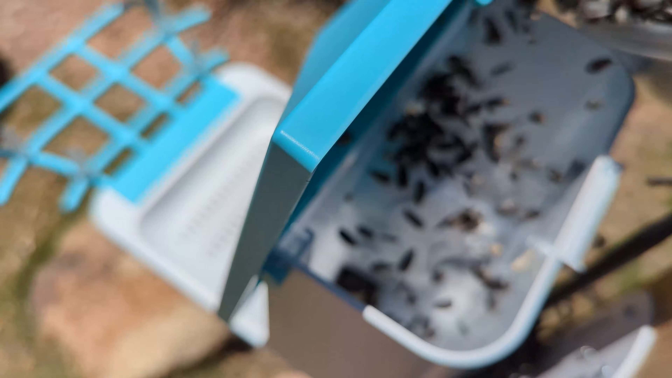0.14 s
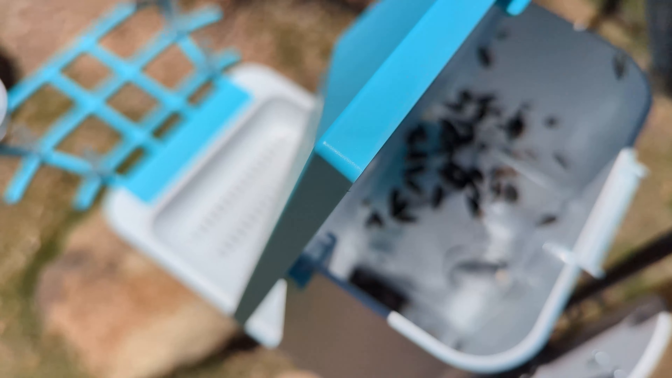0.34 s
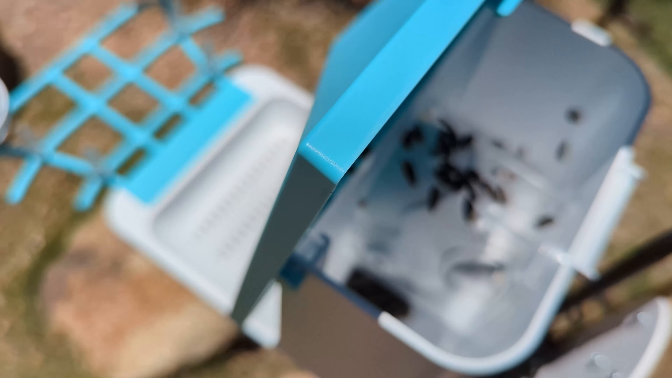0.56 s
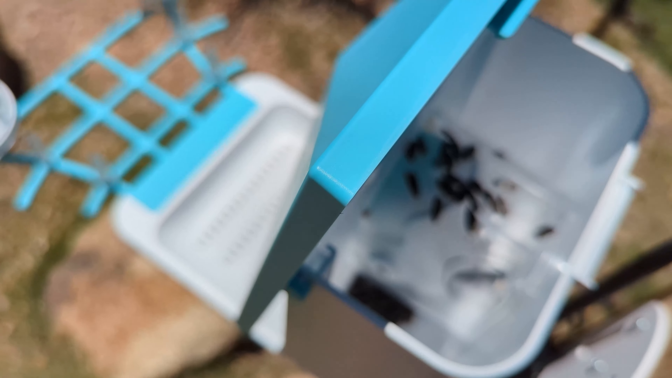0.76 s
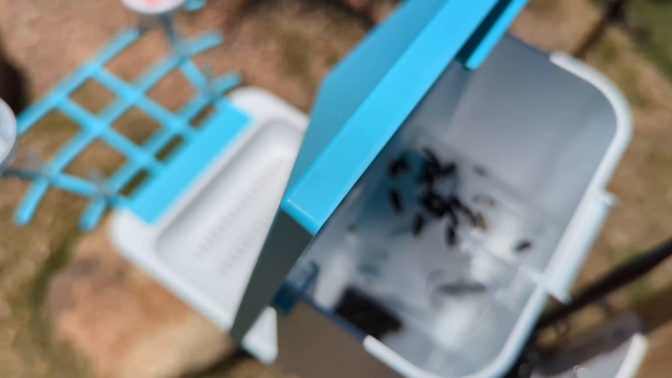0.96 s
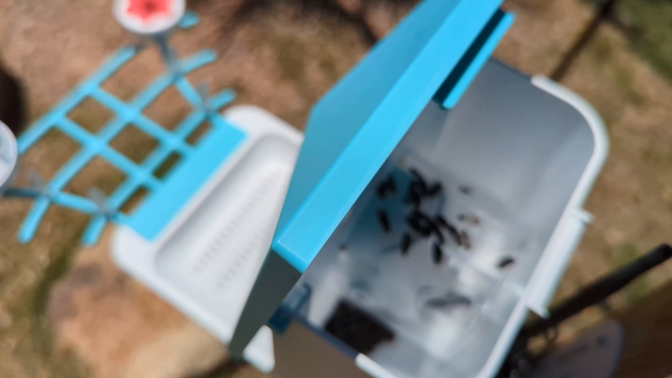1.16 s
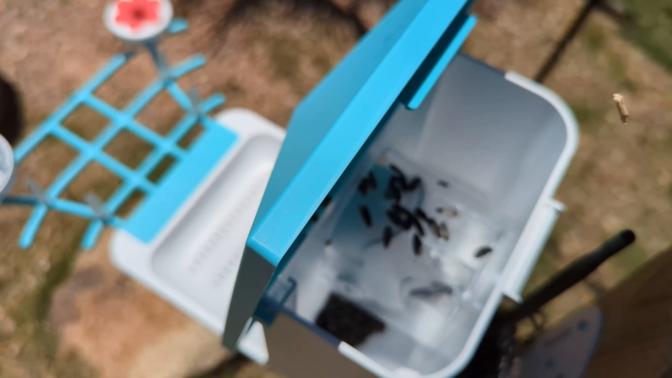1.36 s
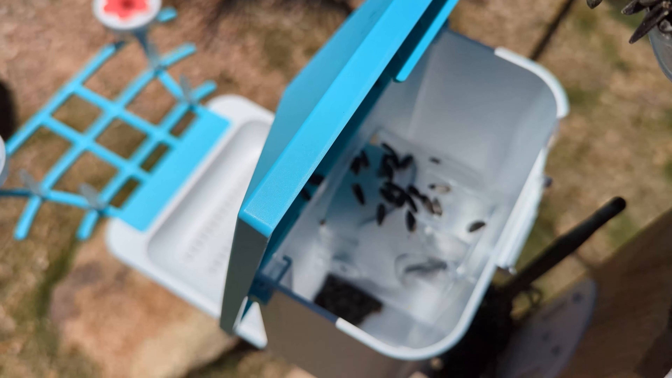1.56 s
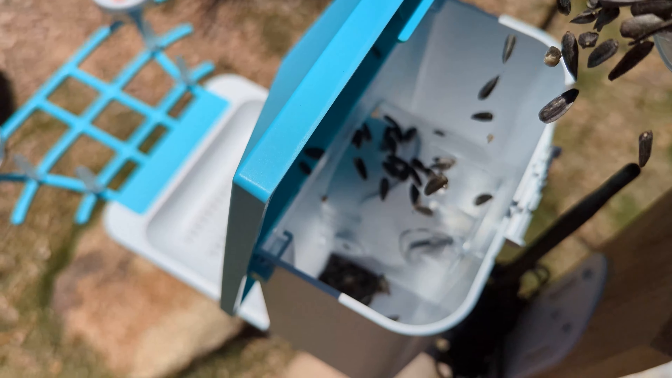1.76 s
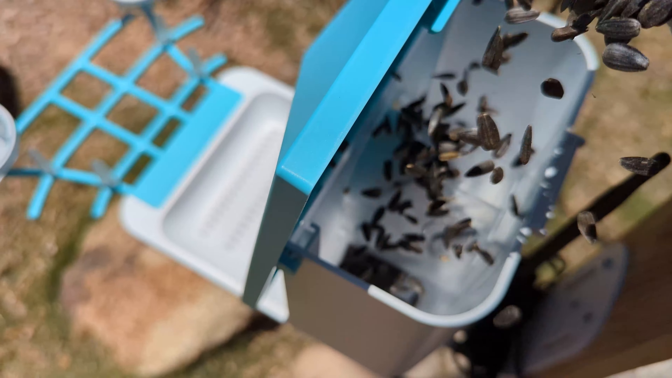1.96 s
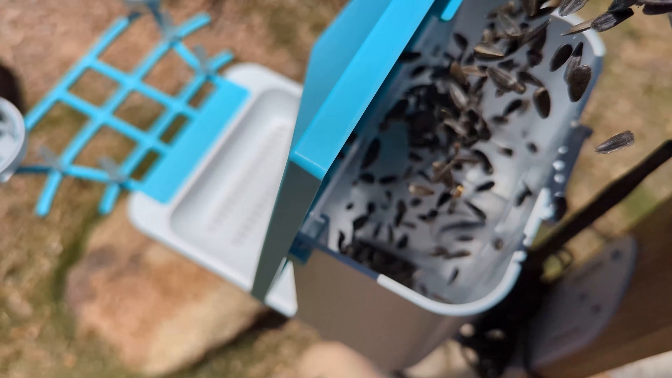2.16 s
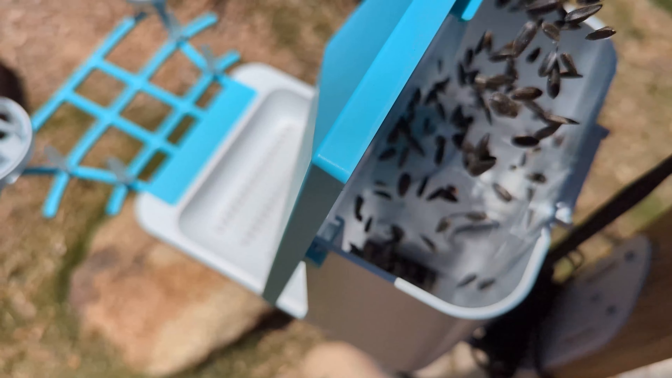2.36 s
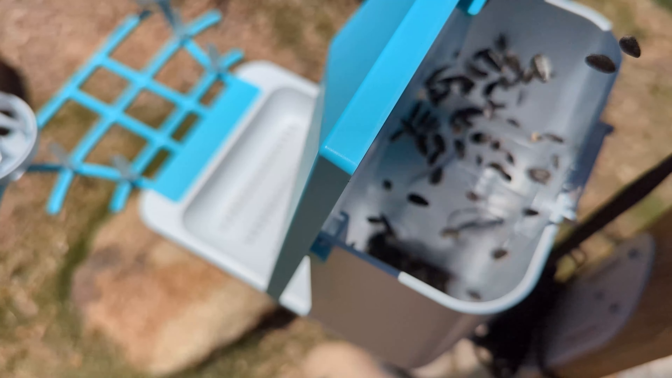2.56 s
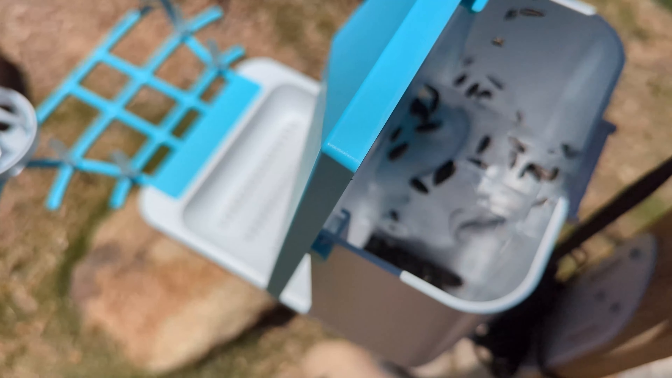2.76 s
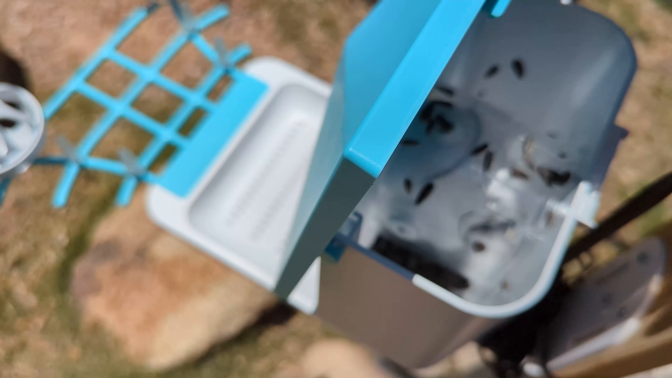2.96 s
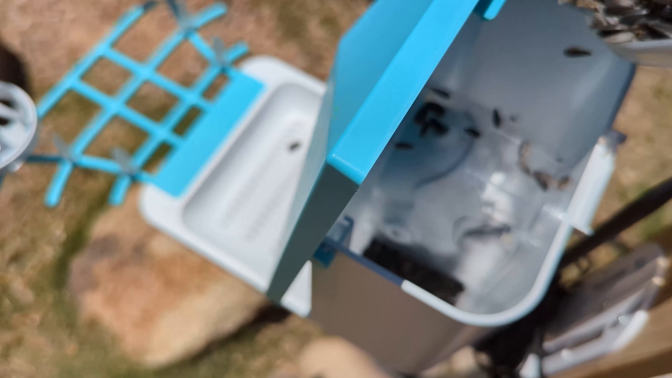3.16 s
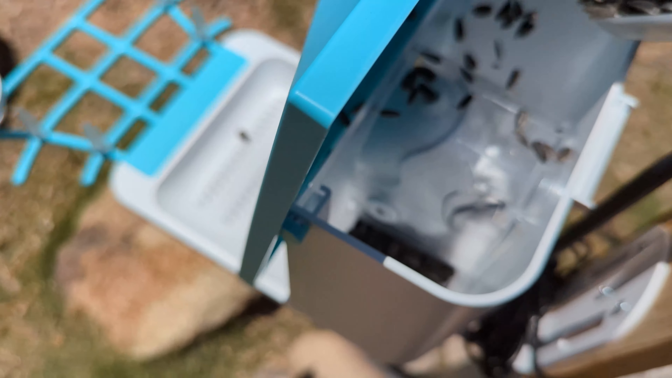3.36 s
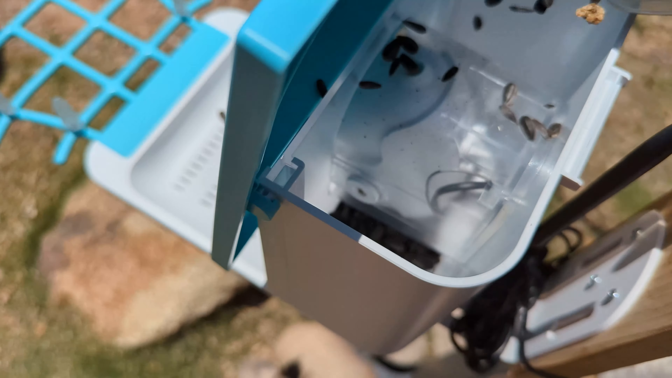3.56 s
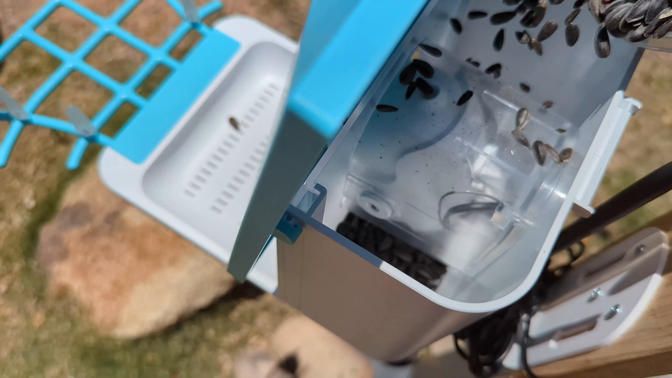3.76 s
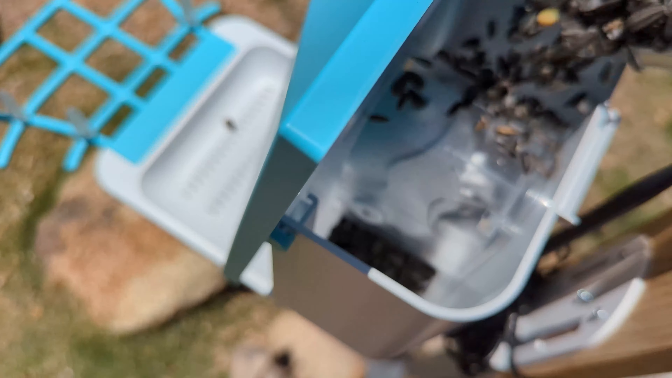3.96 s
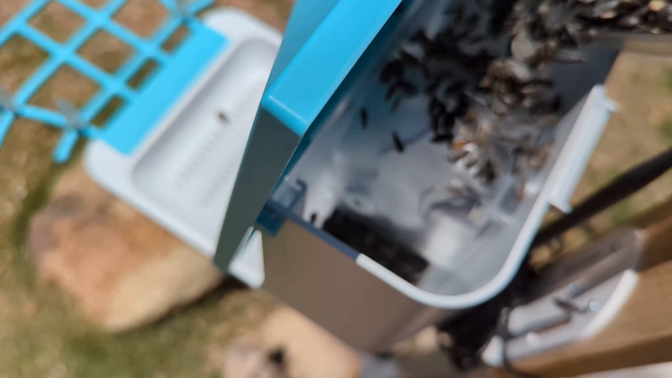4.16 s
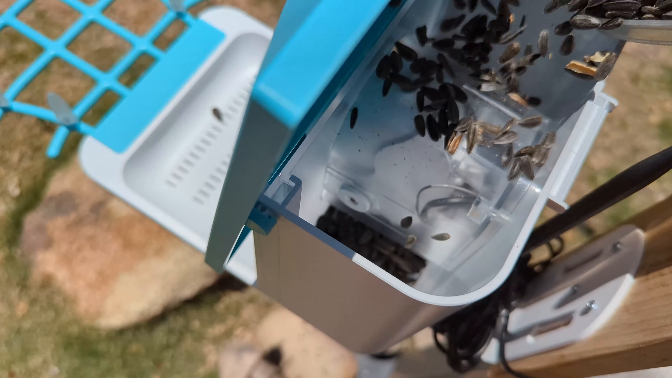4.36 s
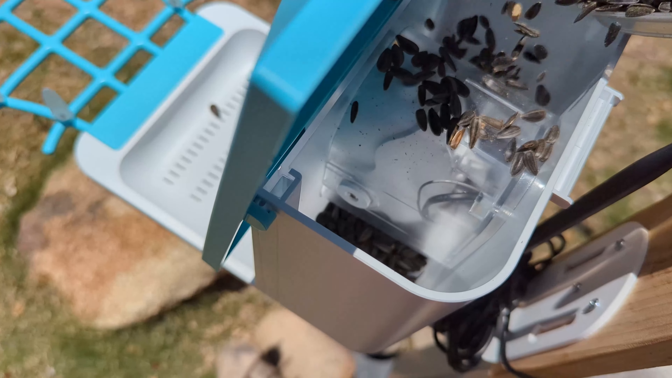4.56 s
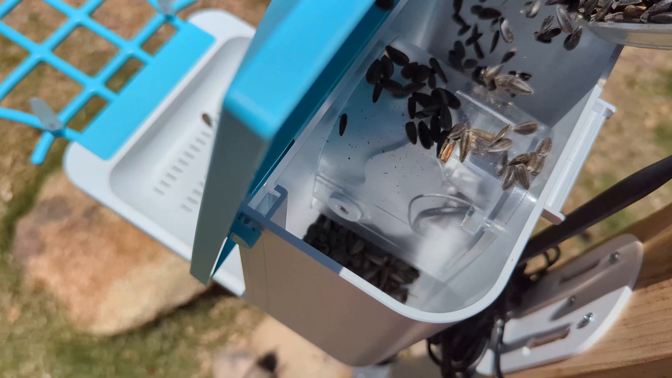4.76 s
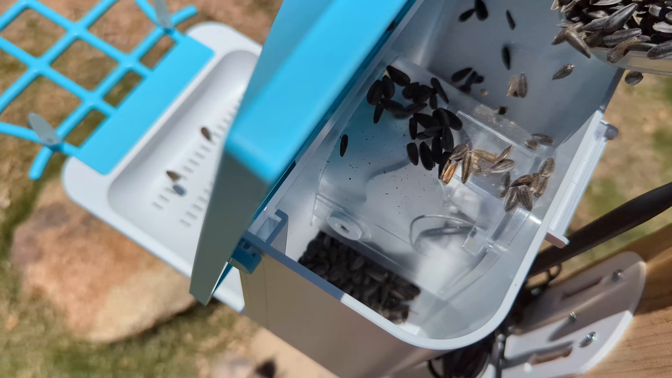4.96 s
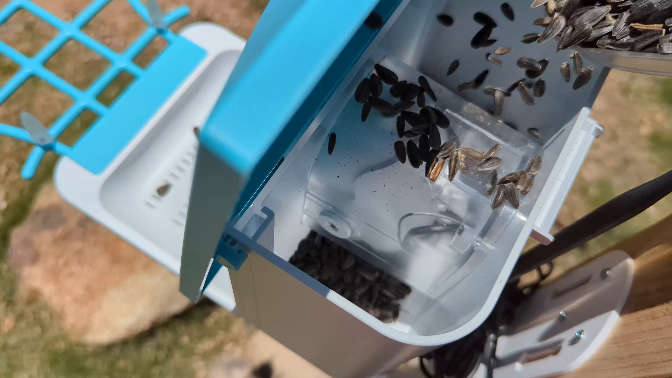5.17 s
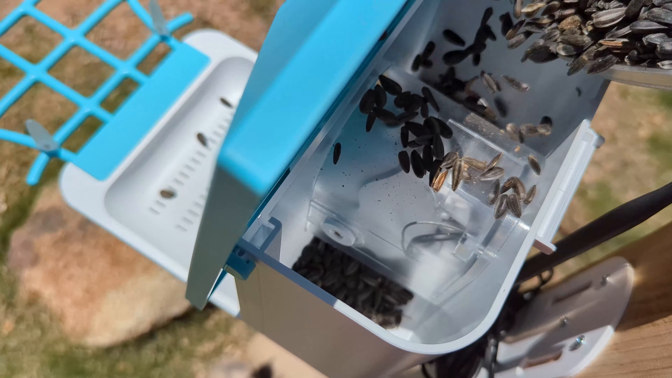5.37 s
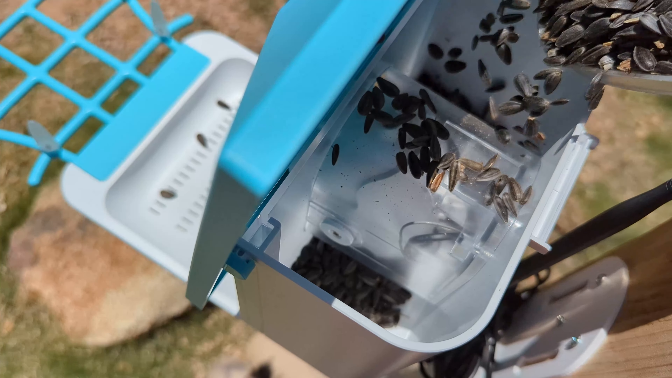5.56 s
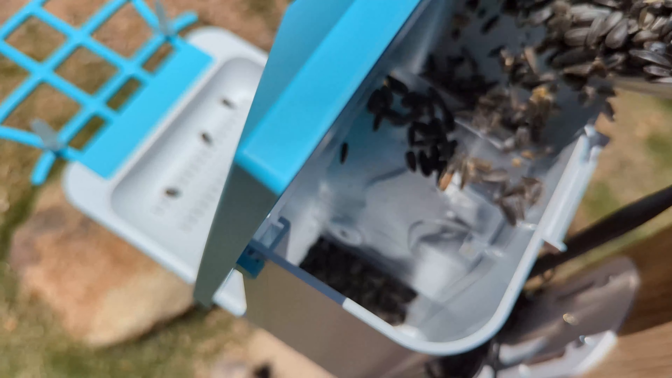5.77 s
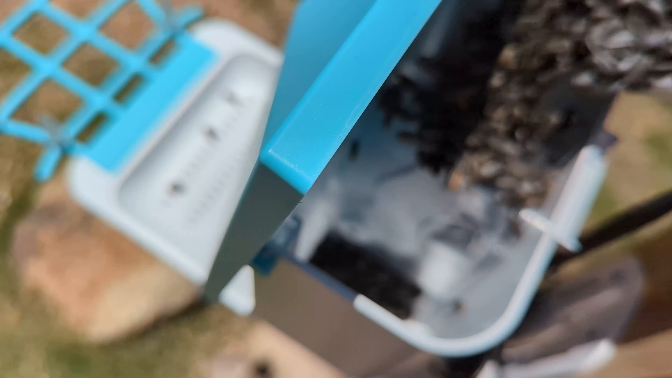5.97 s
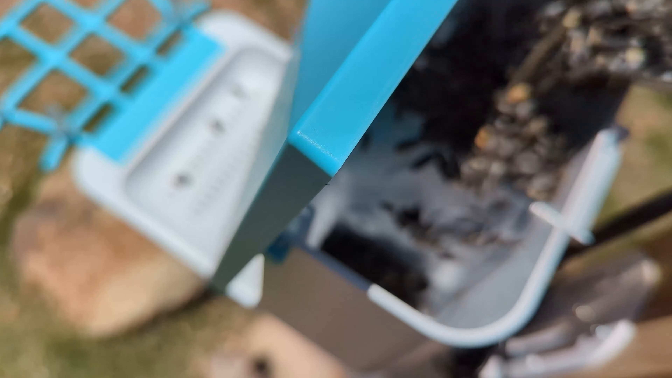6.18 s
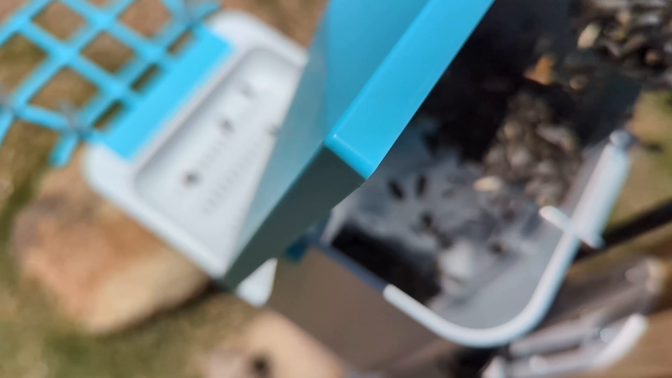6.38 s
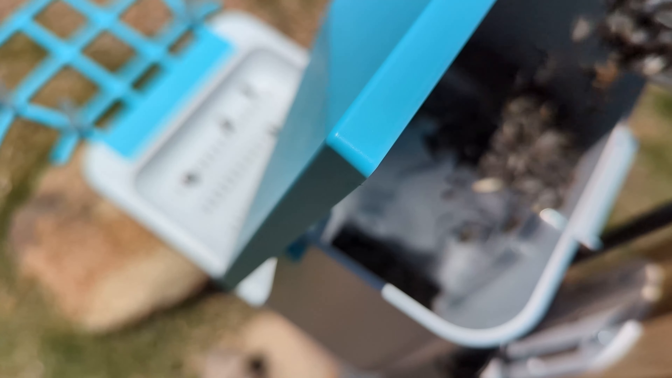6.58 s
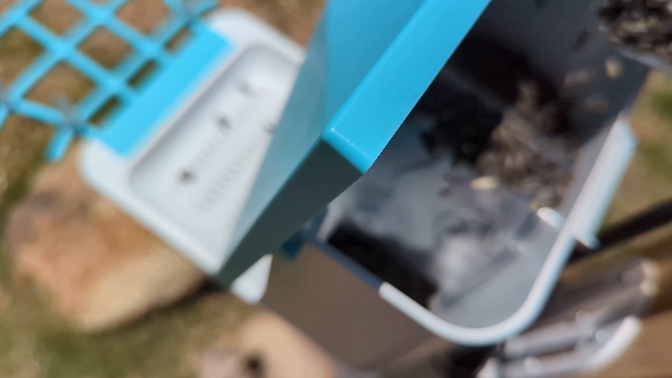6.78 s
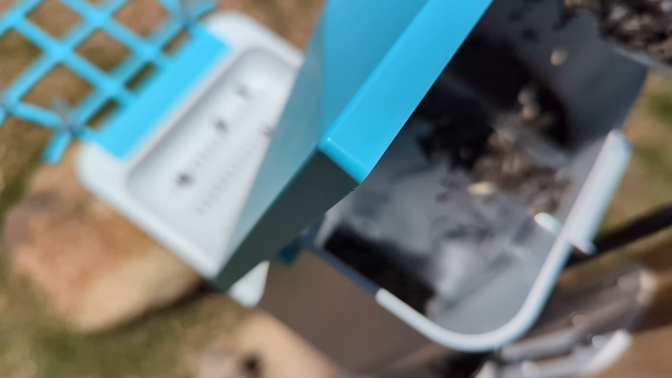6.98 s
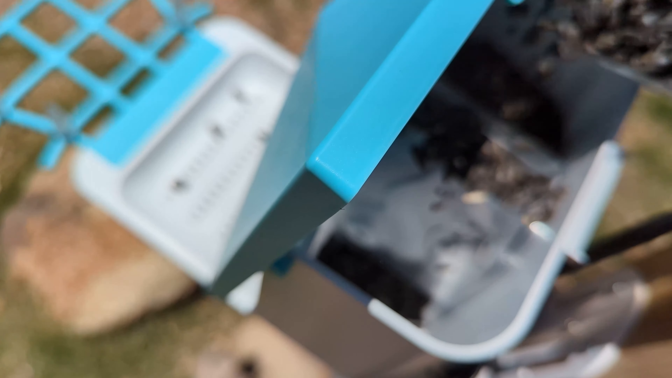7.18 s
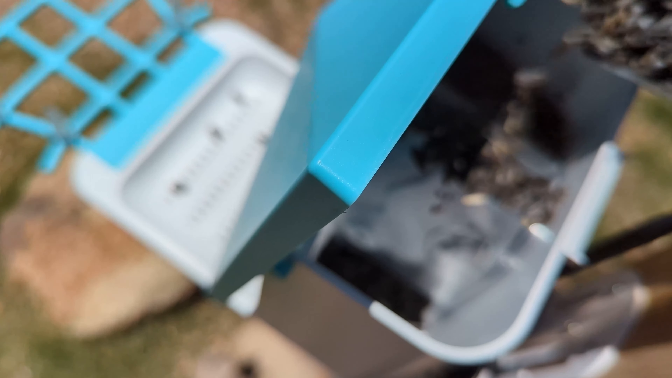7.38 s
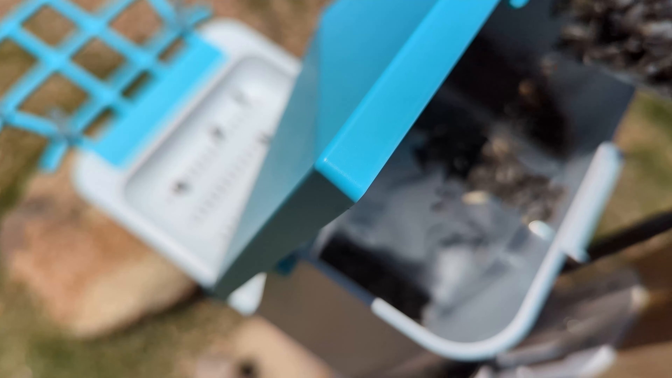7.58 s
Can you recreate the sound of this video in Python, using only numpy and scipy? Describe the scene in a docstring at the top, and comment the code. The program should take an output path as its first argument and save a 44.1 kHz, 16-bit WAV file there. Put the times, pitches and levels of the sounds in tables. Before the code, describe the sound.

Close to a bird feeder outdoors, dry seed is tipped into its plastic hopper in several goes. The first two pours are loud, bright rattles of bouncing seeds with a hollow ring, split by a near-silent pause. The following pours get quieter and turn to a dry rustle as the seed piles up. The hopper takes a few soft knocks and dull taps, and scattered seeds tick at the end. A rumble and hum lie very faintly underneath.

```python
"""Outdoors, close to a bird feeder, dry seed is poured in several goes into its plastic hopper.
Each seed lands with a short bright rattle of bounces that also rings the hopper's walls, a few deep
notes and a hollow note near 4 kHz. As the hopper fills, more seeds land on other seeds and rustle.
The hopper takes three soft knocks. A faint rumble and hum lie below; a noise gate, which turns
quiet stretches down, lets them sink in the pause between pours."""
import sys
import numpy as np
from scipy import signal
from scipy.fft import rfft, irfft
from scipy.io import wavfile
from scipy.ndimage import uniform_filter1d

SR = 44100
rng = np.random.default_rng(int(sys.argv[2]) if len(sys.argv) > 2 else 0)


def digitize_waveform(pressure):
    """Quantize a signal to 16-bit integers and store it at the path in sys.argv[1].

    Rows of a 2-D input are taken as channels; values are limited to [-1, 1].
    """
    field = np.atleast_2d(pressure).T
    bounded = np.clip(field, -1, 1)
    quanta = np.round(bounded * 32767).astype(np.int16)
    wavfile.write(sys.argv[1], SR, quanta)


N = 336483


def from_db(db):
    return 10 ** (np.asarray(db) / 20)


def unit_level(x):
    return x / np.sqrt(np.mean(x ** 2) + 1e-20)


def at_hz(rows, hz):
    """Read a level between rows of (pitch, level)."""
    pitches, levels = np.transpose(rows)
    return np.interp(np.log(hz), np.log(pitches), levels)


def in_time(rows):
    """Join each column of a table by straight lines in time."""
    seconds, *columns = np.transpose(rows)
    return [np.interp(np.arange(N) / SR, seconds, column) for column in columns]


def drift(turns_per_s):
    """A slow random wobble, about 1 in size."""
    points = rng.standard_normal(int(N / SR * 60) + 2)
    return np.interp(np.arange(N) / SR * turns_per_s, np.arange(len(points)), points)


def resonance(x, hz, width_hz):
    """Let through the sound near one pitch."""
    r = np.exp(-np.pi * width_hz / SR)
    feedback = [1, -2 * r * np.cos(2 * np.pi * hz / SR), r * r]
    return signal.lfilter(np.array([1, 0, -1]) * (1 - r * r) / 2, feedback, x)


def fade(power, fade_s):
    """Spread power out in time so that it falls by 60 dB in fade_s seconds."""
    r = from_db(-120 / (fade_s * SR))
    return signal.lfilter([1 - r], [1, -r], power)


def burst(power, fade_s, rise_s=0.021, tail_s=0.27, tail_db=-17):
    """Loudness after each landing: a rounded swell, a fast fall, a faint longer tail."""
    swell = power + 1e-18
    for _ in range(3):
        swell = fade(swell, rise_s)
    return np.sqrt(fade(swell, fade_s) + from_db(2 * tail_db) * fade(swell, tail_s))


def landings(rows, early_s):
    """Turn rows of (seconds, dB) into spikes of power, early_s ahead to leave time for the swell."""
    seconds, level_db = np.transpose(rows)
    starts = np.maximum((seconds - early_s) * SR, 0).astype(int)
    power = np.zeros(N)
    power[starts] = from_db(2 * (level_db - 5)) * 0.0062 * SR
    return power


def uneven(power, spread_db, wobble_db):
    """Give each landing its own random strength, with a slow wobble on top."""
    luck = rng.standard_normal(N // 64 + 1).repeat(64)[:N]
    return power * from_db(2 * (spread_db * luck + wobble_db * drift(7)))


def ring(power, notes, fade_s, spread_db, wobble_db):
    """Bouncing seeds push each note of a body with bursts of noise."""
    out, total_power = 0, 0
    for hz, width_hz, level_db in notes:
        push = rng.standard_normal(N) * burst(uneven(power, spread_db, wobble_db), fade_s)
        wide_hz = 1.95 * width_hz   # filtering twice narrows the note again
        out += from_db(level_db) * resonance(resonance(push, hz, wide_hz), hz, wide_hz)
        total_power += from_db(2 * level_db) * width_hz * 3.21 / SR
    return out / np.sqrt(total_power)


# The tone of the outdoor air. Each row: pitch in Hz, relative level in dB.
AIR_TONE = [(12, -40.5), (20, -9.5), (81, -6), (181, -15.5), (240, -12.5), (288, -13), (487, -21.5),
            (729, -20), (967, -21.5), (2500, -28), (3250, -38), (16000, -42.5)]
# Two hum tones. Each row: pitch in Hz, how far it wavers in Hz, average level in dB.
HUM_TONES = [(76.6, 4.5, -72.5), (238, 2.5, -78.5)]

def background(air_db=-72.5):
    """Distant outdoor rumble and a slightly wavering hum."""
    hz = np.maximum(np.arange(N // 2 + 1) * SR / N, 1)
    spectrum = rfft(rng.standard_normal(N)) * from_db(at_hz(AIR_TONE, hz))
    out = from_db(air_db) * unit_level(irfft(spectrum, N))
    for tone_hz, waver_hz, level_db in HUM_TONES:
        phase = 2 * np.pi * np.cumsum(tone_hz + waver_hz * drift(16)) / SR
        out += np.sqrt(2) * from_db(level_db + 1.6 * drift(23)) * np.sin(phase)
    return out


# Hollow knocks on the hopper. Each row: time in seconds, level in dB.
KNOCK_HITS = [(3.478, -41), (6.054, -43), (6.079, -51)]
# The notes of a knock. Each row: pitch in Hz, relative level in dB, seconds to fade by 60 dB.
KNOCK_NOTES = [(337, -3.5, 0.12), (422, 5, 0.091), (509, 1, 0.14)]

def knocks(contact_s=0.0022):
    """Soft blows set the hopper's low notes ringing; a slow contact rounds the start."""
    out = np.zeros(N)
    touch = np.hanning(round(2 * contact_s * SR))
    for hz, level_db, fade_s in KNOCK_NOTES:
        step = 2 * np.pi * hz / SR
        shake = touch * np.sin(step * np.arange(len(touch))) * 2 / touch.sum()
        push = np.zeros(N)
        for seconds, hit_db in KNOCK_HITS:
            start = round((seconds - contact_s / 2) * SR)
            push[start:start + len(touch)] += from_db(hit_db + level_db + rng.normal(0, 1.7)) * shake
        r = from_db(-60 / (fade_s * SR))
        out += signal.lfilter([0, np.sin(step)], [1, -2 * r * np.cos(step), r * r], push + 1e-18)
    return out


# The hopper's deep notes. Each row: pitch in Hz, width in Hz, relative level in dB.
DEEP_NOTES = [(410, 24, -3), (488, 41, 4.5), (551.3, 100, -7.5)]
# Soft scraping bumps. Each row: time in seconds, level in dB.
SOFT_BUMPS = [(3.245, -40), (3.27, -43), (3.32, -41.5), (5.39, -50)]

def deep_ring(power):
    """Seeds and a few bumps ring the hopper's deep notes."""
    bumps = landings(SOFT_BUMPS, early_s=0.004)
    return ring(power + bumps, DEEP_NOTES, fade_s=0.035, spread_db=2, wobble_db=-2.5)


# The notes of the walls. Each row: pitch in Hz, width in Hz, relative level in dB.
WALL_NOTES = [(790, 130, -13), (875, 89, 0), (997, 210, 2), (1112, 200, -8), (1360, 55, -6.5),
              (1453, 99, 0.5), (1659, 150, -6.5), (2325, 130, -9)]
# Dull taps on the walls. Each row: time in seconds, level in dB.
DULL_TAPS = [(1.68, -73), (4.686, -29), (4.71, -29.5), (6.314, -43), (6.428, -50), (6.824, -53)]

def wall_ring(power):
    """Seeds and a few taps ring the plastic walls."""
    taps = landings(DULL_TAPS, early_s=0.0029)
    return ring(power + taps, WALL_NOTES, fade_s=0.063, spread_db=4.5, wobble_db=3.5)


# The hopper's high, hollow notes. Each row: pitch in Hz, width in Hz, relative level in dB.
HOLLOW_NOTES = [(3030, 170, -7.5), (3900, 170, -2), (4430, 650, -9), (5650, 580, -4), (6430, 79, -14.5)]

def hollow_ring(power):
    """Seeds ring the hopper with a hollow sound, strongest near 4 kHz."""
    return ring(power, HOLLOW_NOTES, fade_s=0.041, spread_db=3.5, wobble_db=4.5)


# Two gliding notes. Each row: time in seconds, hollow note's pitch in Hz, wall note's pitch in Hz.
GLIDE_PITCHES = [(3.5, 3770, 1014), (3.94, 4160, 1065), (4.71, 4150, 983), (5.05, 4390, 1239),
                 (5.5, 4080, 1109), (6.0, 3974, 1141), (6.2, 3947, 1394), (6.77, 4084, 1044),
                 (7.63, 4045, 1120)]

def gliding_ring(wall_power, hollow_power):
    """A wall note and a hollow note wander as the scoop tilts and the heap of seed shifts."""
    hollow_hz, wall_hz = in_time(GLIDE_PITCHES)
    wall = gliding_note(wall_power, wall_hz, width_hz=200, fade_s=0.051)
    return wall + gliding_note(hollow_power, hollow_hz, width_hz=440, fade_s=0.031)


def gliding_note(power, hz, width_hz, fade_s):
    """Smoothed bursts of noise ride on a tone whose pitch moves."""
    push = rng.standard_normal((2, N)) * burst(uneven(power, spread_db=4.5, wobble_db=4.5), fade_s)
    smooth = signal.sosfilt(signal.butter(2, width_hz / 2, fs=SR, output="sos"), push)
    phase = 2 * np.pi * np.cumsum(hz) / SR
    return (smooth[0] * np.cos(phase) + smooth[1] * np.sin(phase)) * np.sqrt(SR / width_hz)


# The tone of seed landing on bare plastic, and on other seed.
# Each row: pitch in Hz, relative level in dB.
ON_PLASTIC_TONE = [(880, -42), (1500, -19.5), (2120, -18.5), (3520, -8), (3840, -24), (4200, -5.5),
                   (6240, -8.5), (8570, 3), (13100, -6), (15100, -14), (16000, -35.5)]
ON_SEED_TONE = [(1500, -24.5), (2690, -32), (3000, -27), (3960, -7), (4590, -7), (6060, -13), (8320, 3),
                (10500, -1), (12900, -2.5), (16000, -20)]

def rattle(power, on_seed):
    """Husks and thin plastic: bands of noise flare with each landing; the highest die first."""
    edges = np.geomspace(1500, 16500, 19)
    centres = np.sqrt(edges[1:] * edges[:-1])
    plastic = from_db(at_hz(ON_PLASTIC_TONE, centres)) * np.sqrt(np.diff(edges))
    seed = from_db(at_hz(ON_SEED_TONE, centres)) * np.sqrt(np.diff(edges))
    plastic, seed = plastic / np.linalg.norm(plastic), seed / np.linalg.norm(seed)
    noise = rng.standard_normal((2, N))
    out = 0
    for k, hz in enumerate(centres):
        band_filter = signal.butter(2, edges[k:k + 2], "band", fs=SR, output="sos")
        band = unit_level(signal.sosfilt(band_filter, noise[k % 2]))
        hits = uneven(power, spread_db=2.5, wobble_db=1.68 + 2.2 * on_seed)
        gain = plastic[k] ** (1 - on_seed) * seed[k] ** on_seed
        out += gain * band * burst(hits, fade_s=0.012 * (hz / 8000) ** -0.2)
    return out


# Single seeds and clumps that stand out. Each row: time of the peak in seconds, level in dB.
CLEAR_LANDINGS = [(0.507, -40), (0.528, -23), (0.561, -11.5), (0.579, -9), (0.665, -14), (0.745, -14),
                  (0.763, -23), (0.789, -31), (0.805, -21), (0.834, -31), (0.851, -35), (0.873, -32),
                  (0.904, -29.5), (0.917, -32.5), (0.963, -37), (1.677, -60), (1.722, -60), (1.757, -63),
                  (1.853, -27.5), (1.897, -13.5), (1.927, -9), (1.943, -9.5), (1.977, -10.5),
                  (2.028, -11.5), (2.067, -8.5), (2.1, -3.5), (2.539, -15), (2.565, -9), (2.812, -11),
                  (2.837, -18), (2.853, -7), (2.878, -17), (2.904, -17), (2.92, -16.5), (2.945, -13),
                  (2.958, -15), (3.0, -7), (3.043, -15.5), (3.08, -18.5), (3.129, -21.5), (3.141, -18),
                  (3.208, -18.5), (3.245, -25), (3.299, -34), (3.323, -41), (3.38, -40), (3.453, -41.5),
                  (3.473, -47), (3.539, -50), (3.586, -35), (3.612, -30.5), (3.655, -22), (3.688, -29.5),
                  (3.76, -39), (3.873, -19.5), (4.857, -24), (4.905, -17), (4.954, -17.5), (4.995, -24),
                  (5.062, -30), (5.094, -25), (5.178, -30.5), (5.216, -33), (5.238, -28.5), (5.31, -32.5),
                  (5.338, -33.5), (5.389, -38), (5.455, -30), (5.538, -31), (5.716, -37), (5.75, -24.5),
                  (5.917, -28), (6.052, -23), (6.549, -36.5), (6.589, -36.5), (6.616, -39), (6.683, -43),
                  (6.761, -36), (6.839, -36), (6.862, -43), (6.893, -40.5), (6.91, -44), (6.941, -39.5),
                  (6.97, -43), (7.0, -52), (7.023, -54), (7.059, -50), (7.135, -42), (7.19, -45),
                  (7.205, -45.5), (7.244, -43.5), (7.301, -39.5), (7.324, -37.5), (7.344, -37),
                  (7.392, -33.5), (7.424, -27.5), (7.481, -36), (7.502, -28), (7.559, -32), (7.607, -34.5)]

def single_seeds(stream_db, strays_per_s=45, follow=0.79):
    """The listed landings plus random strays, which grow less than the stream and drown in it."""
    seconds = np.sort(rng.uniform(0, N / SR, round(strays_per_s * N / SR)))
    seconds = seconds[pours_at(seconds) > 0]
    # Strays sit around -40.5 dB when the stream is at -45 dB.
    stray_db = -40.5 + follow * (stream_db[(seconds * SR).astype(int)] + 45)
    stray_db += rng.normal(0, 4, len(seconds))
    return landings(CLEAR_LANDINGS, early_s=0.006) + landings(np.c_[seconds, stray_db], early_s=0)


# The strength of the stream, one list for each pour. Each row: time in seconds, level in dB.
POUR_LEVELS = [
    [(0.0, -17.5), (0.16, -15), (0.64, -23.5), (0.73, -34.5), (0.83, -70), (1.0, -101)],
    [(1.86, -68.5), (1.93, -25.5), (2.07, -28), (2.11, -15), (2.35, -14.5), (2.7, -17), (2.92, -25.5),
     (3.03, -25.5), (3.09, -59), (3.15, -37.5), (3.22, -33), (3.27, -60), (3.42, -70)],
    [(3.44, -67), (3.5, -53.5), (3.62, -48.5), (3.76, -52.5), (3.89, -31.5), (4.02, -24.5), (4.6, -26.5),
     (4.82, -35.5), (5.0, -37.5), (5.22, -48), (5.29, -60)],
    [(5.3, -51), (5.4, -41.5), (5.8, -48.5), (5.89, -35), (6.04, -36), (6.2, -48), (6.34, -44.5),
     (6.4, -47.5), (6.56, -53), (6.92, -55.5), (7.06, -74)],
    [(7.07, -65.5), (7.3, -71), (7.41, -47.5), (7.63, -63.5)],
]

def pours_at(seconds):
    """1 during a pour, 0 between pours."""
    return sum((seconds >= pour[0][0]) & (seconds <= pour[-1][0]) for pour in POUR_LEVELS)


def seed_stream(stream_db):
    """The power of seeds landing at random moments; a louder stream is also a denser one."""
    seeds_per_s = np.maximum(480 * from_db(0.12 * (stream_db + 19)), 280)
    clumping = from_db(2 * drift(18) + 2 * drift(45))
    sizes = from_db(2.94 * np.minimum(rng.exponential(1, N), 4))
    lands = rng.random(N) < seeds_per_s / SR * clumping
    power_per_seed = from_db(2 * stream_db) * SR / seeds_per_s
    return lands * sizes / sizes.mean() * power_per_seed * pours_at(np.arange(N) / SR)


# How the sound changes as the hopper fills. Each row: time in seconds, share of seeds landing on seed
# (0 to 1), wall and hollow drive in dB against the rattle, deep drive in dB against the wall drive.
HOPPER_FILL = [(0, 0.03, -17, -14, -9), (1.9, 0.16, -18.5, -14, -10), (3.0, 0.07, -17, -13, -8.5),
               (3.35, 0.11, -12.5, -15.5, -27), (3.65, 0.15, -13, -7.5, -13),
               (3.9, 0.52, -19.5, -15.5, -11.5), (4.7, 0.71, -18, -13.5, -23.5),
               (5.2, 0.9, -27.5, -19.5, -1), (5.9, 0.99, -22.5, -10, -11), (6.1, 1, -20, -1.5, -13),
               (6.34, 0.75, -12, 0, -13), (6.6, 0.35, -24.5, -11.5, -3.5), (7.1, 0.87, -22, -11, -6),
               (7.45, 1, -30.5, -12, 0)]

def scene(low_cut_hz=290):
    """The stream and the single seeds feed the rattle and the ringing, over knocks and background."""
    stream_db, = in_time(np.concatenate(POUR_LEVELS))
    on_seed, wall_db, hollow_db, deep_db = in_time(HOPPER_FILL)
    stream = seed_stream(stream_db)
    singles = single_seeds(stream_db)
    # These are powers, so dB values are doubled in from_db.
    wall_power = stream * from_db(2 * wall_db)
    wall_power += singles * from_db(2 * np.minimum(wall_db - 7.5, -24))   # too light to boom
    hollow_power = (stream + from_db(2 * -1.5) * singles) * from_db(2 * hollow_db)
    seeds = rattle(stream + singles, on_seed)
    # The more seeds land on seed, the more the gliding notes replace the steady ones.
    seeds += wall_ring(wall_power * (1 - 0.86 * on_seed))
    seeds += deep_ring(wall_power * from_db(2 * deep_db))
    seeds += hollow_ring(hollow_power * (1 - 0.81 * on_seed))
    seeds += gliding_ring(wall_power * on_seed * 0.83, hollow_power * on_seed * 0.77)
    # Cut the low bass from the seed sounds so they stay light, without thuds.
    seeds = signal.sosfilt(signal.butter(4, low_cut_hz, "high", fs=SR, output="sos"), seeds)
    return (seeds + knocks() + background())[None]


def noise_gate(x, open_db=-62, slope=2.9, depth_db=-24, close_db_per_s=42):
    """Listens above 1 kHz; opens at once when there is sound and closes slowly in the quiet."""
    heard = signal.sosfilt(signal.butter(2, 1000, "high", fs=SR, output="sos"), x)
    level_db = 10 * np.log10(np.abs(uniform_filter1d(heard ** 2, size=441)) + 1e-14)
    wanted_db = np.clip(slope * (level_db - open_db), depth_db, 0)
    ramp = close_db_per_s * np.arange(N) / SR
    return x * from_db(np.maximum.accumulate(wanted_db + ramp) - ramp)


def record(dry, ceiling=0.88, top_hz=15800):
    """Turn the quiet stretches down, round off the loudest peaks and cut the highest treble."""
    gated = noise_gate(dry[0])
    rounded = gated / (1 + (gated / ceiling) ** 6) ** (1 / 6)
    return signal.sosfilt(signal.ellip(12, 0.5, 75, top_hz, fs=SR, output="sos"), rounded)[None]


dry = scene()
out = record(dry)
digitize_waveform(out)
```